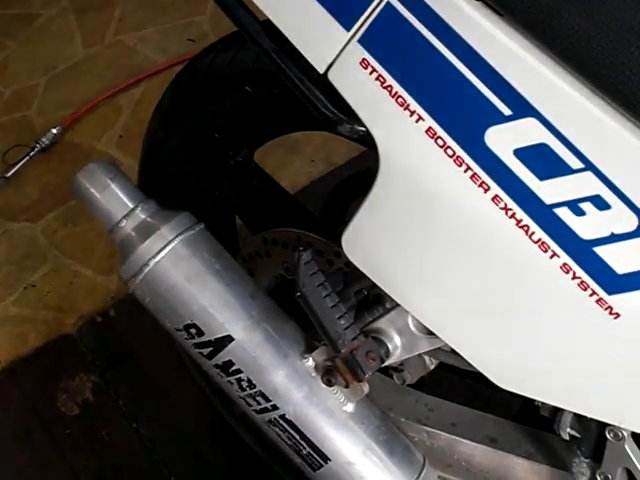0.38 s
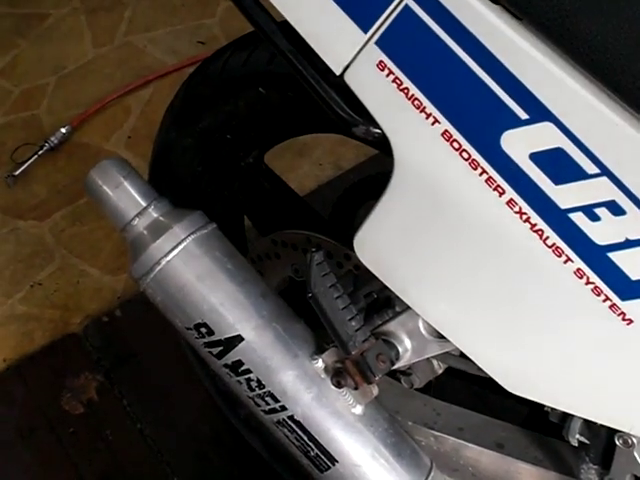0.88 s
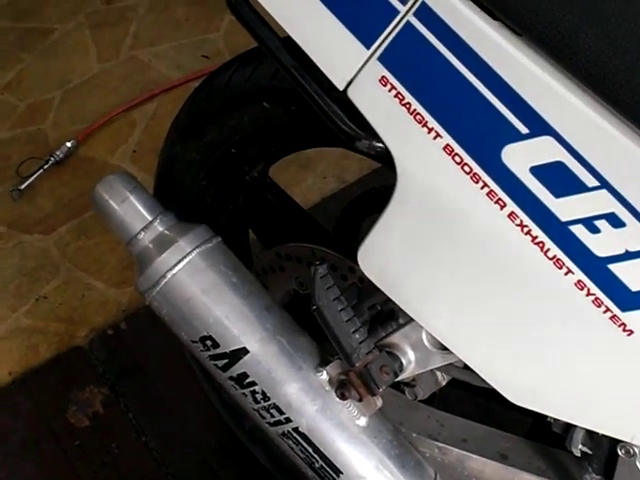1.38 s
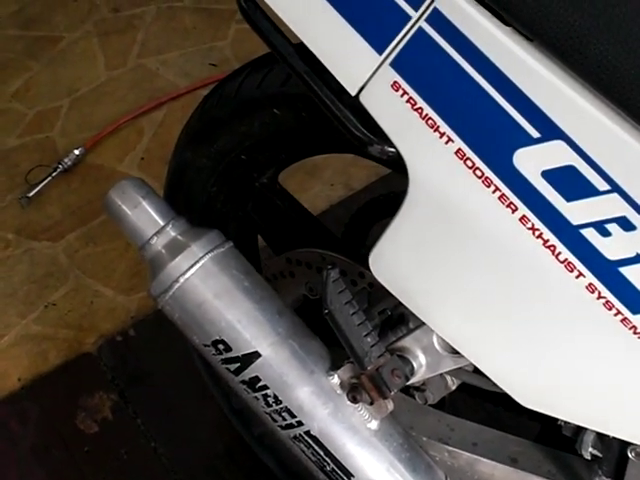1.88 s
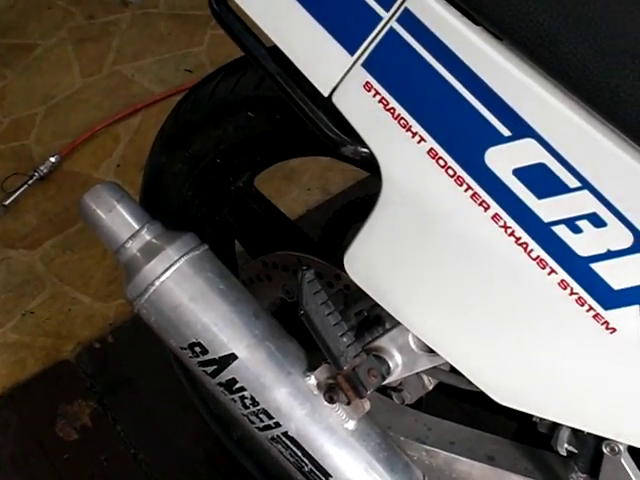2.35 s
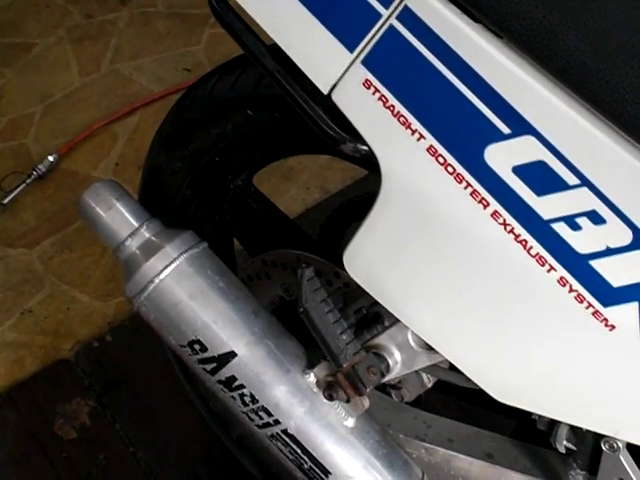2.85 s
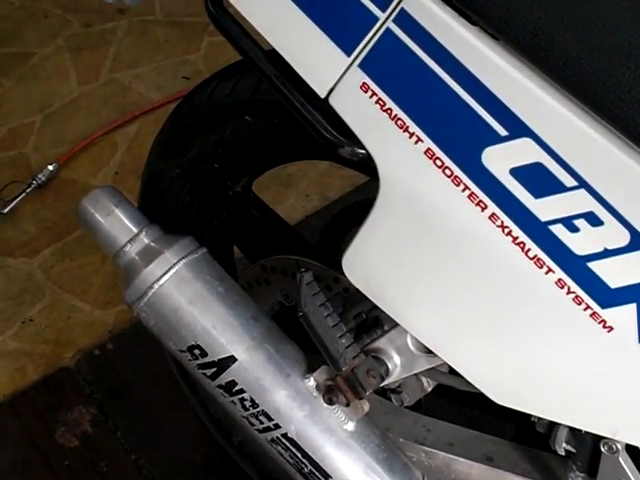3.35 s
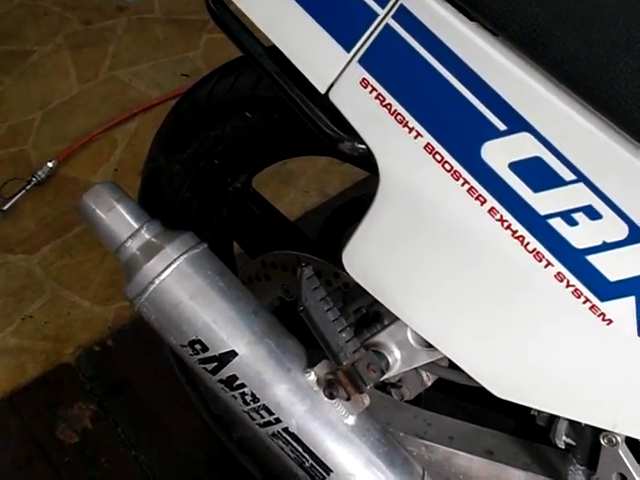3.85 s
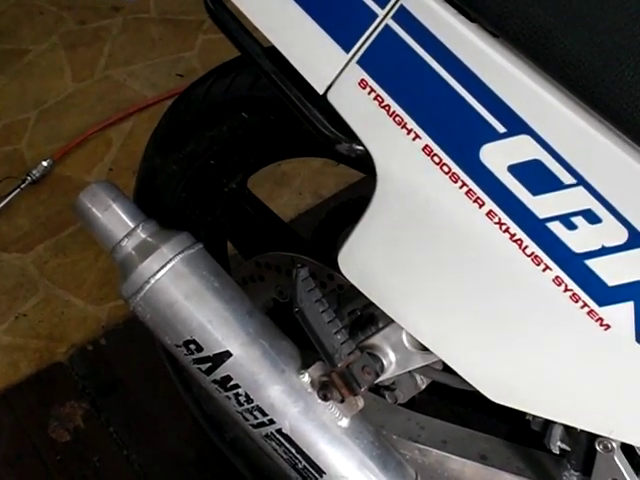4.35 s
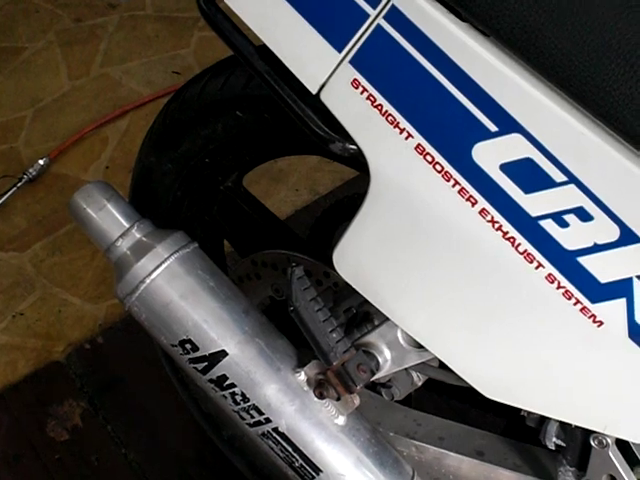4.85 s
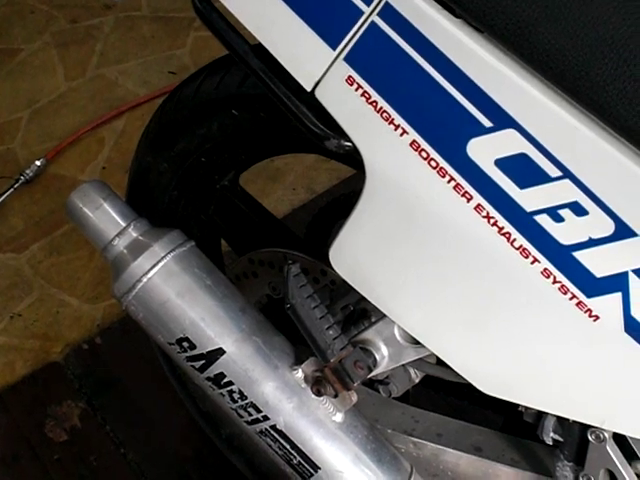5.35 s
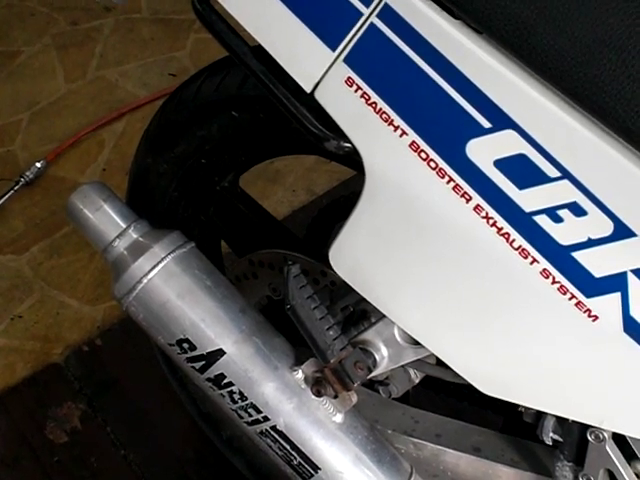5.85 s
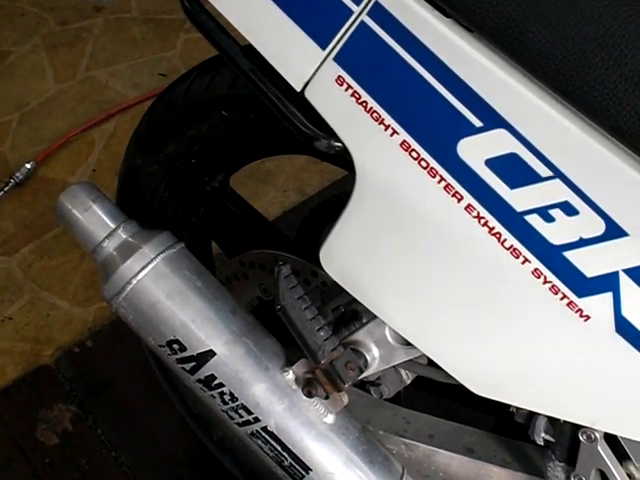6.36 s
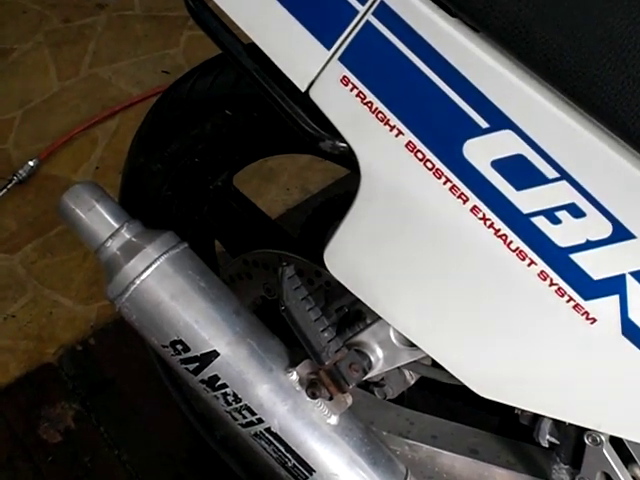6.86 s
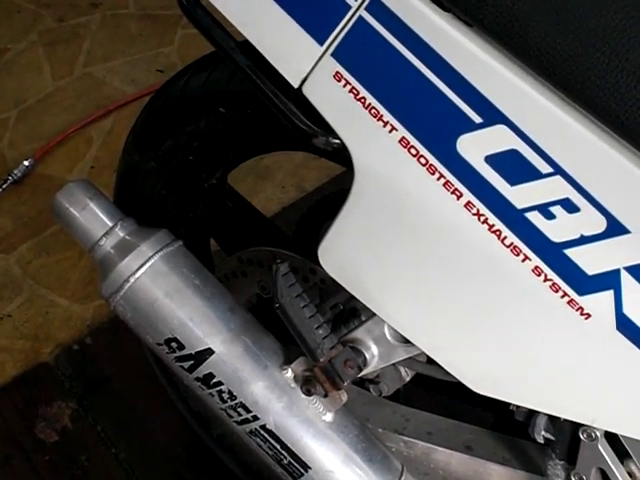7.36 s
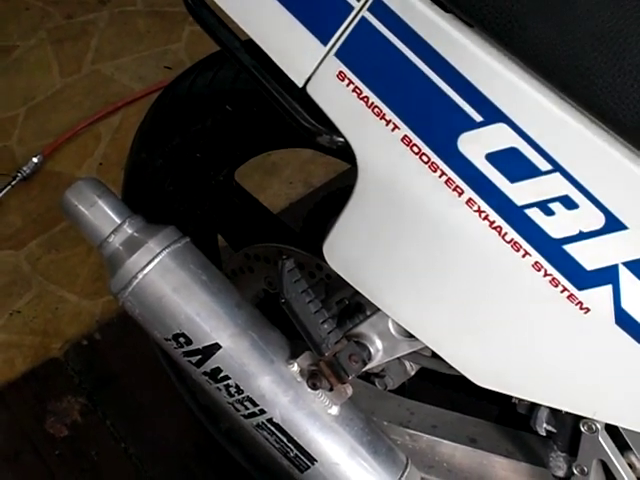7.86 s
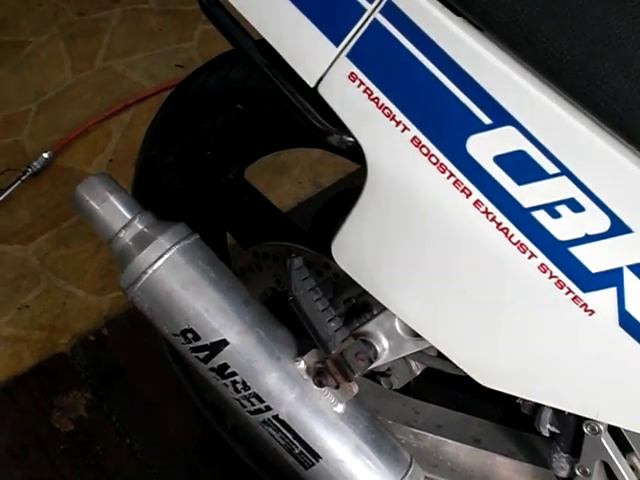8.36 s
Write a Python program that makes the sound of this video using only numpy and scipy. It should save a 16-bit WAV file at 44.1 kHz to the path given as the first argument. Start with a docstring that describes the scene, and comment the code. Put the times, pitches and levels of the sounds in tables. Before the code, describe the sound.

A four-cylinder motorcycle engine stands idling, its exhaust right beside the microphone, low and lumpy, surging and stumbling. Two quick throttle blips follow, each sweeping up into a hard, bright rasp with a crack near the top, then falling smoothly into a softer hum. Gas hiss and slight valve rattle beat with the firing; hard floor and walls add short reverberation.

```python
"""Indoors, close to the silencer of a four-cylinder motorcycle: its engine idles unsteadily and is blipped twice.
Three steady tones follow the firing rate, and uneven firing pulses ring the pipe as a rumble with deep thuds.
Under load the pulses steepen into a rasp; filtered noise makes gas rush and hiss that beat with the firings.
Valves rattle, a gear whines and two hard cracks come near full speed; air whistles past the opening throttle.
Random echoes, dying away, stand for the hard walls and floor."""
import sys
import numpy as np
from scipy import signal
from scipy.fft import irfft
from scipy.io import wavfile
from scipy.ndimage import uniform_filter1d

SR = 44100
rng = np.random.default_rng(int(sys.argv[2]) if len(sys.argv) > 2 else 0)


def to_wav(s):
    """Save 16-bit WAV."""
    ch = np.atleast_2d(s).T  # columns
    pcm = np.round(np.clip(ch, -1, 1) * 32767)  # PCM
    wavfile.write(sys.argv[1], SR, pcm.astype(np.int16))


def how_loud(loudness_db):
    """Turn decibels into a plain amplitude multiplier (0 dB gives 1, 20 dB gives 10)."""
    steps = np.asarray(loudness_db, float) / 20
    return 10 ** steps


N = 373668
TIME = np.arange(N) / SR  # seconds
HZ = np.fft.rfftfreq(8192, 1 / SR)  # frequencies at which responses are worked out


# Engine speed as set, before hunting adds to it. Each row: time in seconds, firings per second.
SET_SPEED = [(0, 47.3), (1.5, 48), (2.7, 46.8), (3.44, 47), (3.56, 78.9), (3.73, 142), (3.89, 228.6),
             (4.01, 265), (4.12, 289), (4.25, 298.6), (4.31, 292), (4.37, 262), (4.6, 188.7), (4.78, 145),
             (4.98, 113.5), (5.23, 85.1), (5.64, 65), (5.9, 59), (6.25, 55.2), (6.35, 79.1), (6.51, 160.1),
             (6.65, 229.6), (6.72, 256), (6.82, 284), (6.91, 327.6), (6.98, 341.2), (7.03, 328.6),
             (7.24, 246.6), (7.41, 196.1), (7.55, 163.3), (7.74, 128), (7.97, 97.2), (8.3, 73.6),
             (8.47, 64.4)]
# Loudness of the outlet noises before hunting. Each row: time in seconds, rasp and rush in dB, hiss in dB.
OUTLET_LEVELS = [(0, -43, -40.5), (2.2, -43.5, -40.5), (3.45, -41, -38), (3.54, -37.5, -34),
                 (3.68, -38, -33.5), (3.73, -31, -31), (3.77, -37.5, -34.5), (4.01, -21.5, -30),
                 (4.06, -38, -32), (4.08, -23.5, -26.5), (4.25, -24, -28.5), (4.29, -33, -30.5),
                 (4.43, -39.5, -34), (4.6, -40.5, -41), (4.98, -54, -49.5), (5.4, -57.5, -53.5),
                 (6.25, -57.5, -53.5), (6.32, -48, -44.5), (6.51, -36, -33.5), (6.6, -35, -33.5),
                 (6.67, -24.5, -31), (6.78, -22.5, -30.5), (6.82, -23, -22.5), (6.92, -24, -24.5),
                 (6.96, -26.5, -28.5), (7.01, -38.5, -32), (7.31, -44, -42.5), (7.74, -56.5, -54),
                 (8.47, -64, -60.5)]
HUNT_RASP, HUNT_HISS = 0.32, 0.32  # shares of the hunting dB


def engine():
    """All sounds of the running engine share one count of firings, so they speed up and slow down together."""
    hunt_db, gained = hunting()
    rate = curves(SET_SPEED)[0] + gained
    rasp_db, hiss_db = curves(OUTLET_LEVELS) + np.outer([HUNT_RASP, HUNT_HISS], hunt_db)
    uneven_db, steep, cut_db, thud_db = throttle(rate)
    uneven_db, steep = np.clip(uneven_db, .4, 6), np.clip(steep, 0, 1)
    turns = np.cumsum(rate) / SR  # firings so far
    tones = ringing(orders(rate, turns, uneven_db, hunt_db))
    pulses = uneven_pulses(rate, turns, uneven_db)
    noises = rumble(pulses, rate, uneven_db, hunt_db, cut_db, thud_db)
    noises += rasp(pulses, rate, uneven_db, steep, rasp_db, hiss_db)
    noises += rush(turns, steep, rasp_db)
    noises += hiss(rate, turns, steep, hiss_db)
    noises += gear(rate, turns, rasp_db)
    return room(tones, t60=0.41, wet_db=-14) + room(noises, t60=0.65, wet_db=-8.0)


# The engine hunts: runs of strong burns surge, weak ones stumble.
# Each row: middle in seconds, spread to each side in seconds, level change in dB.
HUNTING_SWINGS = [(.12, .05, 2), (.23, .025, -4), (.33, .05, 4), (.46, .035, -5), (.62, .06, 2),
                  (.82, .03, -4.5), (.93, .05, 2.5), (1.08, .025, -6), (1.2, .06, 4), (1.36, .04, -4.5),
                  (1.57, .07, 2), (1.7, .035, -4), (1.87, .04, 5), (2, .045, -6.5), (2.13, .05, 2.5),
                  (2.29, .025, -4), (2.42, .03, 2), (2.57, .03, -3), (2.72, .04, -2), (2.86, .04, 2.5),
                  (2.97, .02, -3.5), (3.15, .03, -4), (3.25, .05, 3), (3.4, .06, 2), (5.18, .015, -5),
                  (5.31, .015, -5), (5.69, .025, -7), (5.83, .02, -7), (6.08, .015, -4), (7.98, .03, -4),
                  (8.2, .03, -3)]
GAIN_PER_DB_S, SETTLE_S = 7.5, .3  # firings per s gained per dB held a second; time to settle back


def hunting():
    """Strong burns push the speed up, weak ones let it sag: gives the level swing in dB and the added speed."""
    db = sum(size_db * np.exp(-.5 * ((TIME - s) / spread) ** 2) for s, spread, size_db in HUNTING_SWINGS)
    gained = signal.lfilter([GAIN_PER_DB_S / SR], [1, -np.exp(-1 / SETTLE_S / SR)], db)
    return db, gained


# Throttle blips. Each row: opening, shutting and return of firing, all in seconds,
# then thud level from that return on, in dB against the thuds at the start.
THROTTLE_BLIPS = [(3.468, 4.283, 4.54, -1.5), (6.26, 6.974, 7.37, -4)]
# burns even out with speed under load; a shut throttle pumps evenly
UNEVEN_DB, EVEN_DB_PER_RATE, PUMPING_DB = 3.5, 0.04, 1.7
# share of the rasp that is steep pulses, growing with firings per s gained
STEEP_IDLE, STEEP_PER_RATE, STEEP_MOST, STEEP_DIES_S = 0.046, 0.0033, 0.76, .1
CUT_DB, CUT_S = -13.5, 0.043  # with no fuel burning the rumble sinks
THUD_LOSS_DB, THUD_FADE_S = -40, 0.24  # thuds fade once the throttle is open


def throttle(rate):
    """Load evens and steepens the burns: gives unevenness, steep share, and changes of rumble and thuds in dB."""
    uneven_db, steep = np.full(N, UNEVEN_DB), np.full(N, STEEP_IDLE)
    cut, thud_db = np.zeros(N), np.zeros(N)
    for opens, shuts, resumes, after_db in THROTTLE_BLIPS:
        on = (TIME > opens) & (TIME <= shuts)
        off = (TIME > shuts) & (TIME < resumes)
        gained = np.interp(np.minimum(TIME, shuts), TIME, rate) - rate[0]
        loaded_db = UNEVEN_DB - EVEN_DB_PER_RATE * gained
        uneven_db = np.where(on, loaded_db, np.where(off, PUMPING_DB, uneven_db))
        load = np.minimum(STEEP_PER_RATE * gained, STEEP_MOST)
        load = load * np.exp(-np.maximum(TIME - shuts, 0) / STEEP_DIES_S)
        steep = np.maximum(steep, load * (on | off))
        cut += off * np.minimum((TIME - shuts) / CUT_S, 1)
        fading_db = thud_db + THUD_LOSS_DB * np.minimum((TIME - opens) / THUD_FADE_S, 1)
        thud_db = np.where(on | off, fading_db, np.where(TIME >= resumes, after_db, thud_db))
    return uneven_db, steep, CUT_DB * cut, thud_db


# Tones at 1, 2 and 3 times the firing rate, before standing waves and hunting.
# Each row: time in seconds, first tone in dB, second and third in dB against the first.
TONE_LEVELS = [(0, -16, -5, -7.5), (3.44, -15.5, -5.5, -7.5), (3.49, -12.5, -5, -18),
               (3.55, -9.5, -4, -12.5), (3.66, -13, -10.5, -6.5), (3.75, -15.5, -2, -9),
               (3.85, -15, -5.5, -10.5), (4.0, -20.5, 1.5, -1), (4.1, -24, 4.5, -0.5),
               (4.25, -22.5, 1.5, 4.5), (4.3, -23.5, -5, -10), (4.36, -20.3, -12, -18),
               (4.5, -22.5, -12, -22), (4.7, -28.5, -7.5, -24), (4.9, -31.5, -1.5, -16),
               (5.1, -32, -15, -8.5), (5.5, -34, -3.5, -15), (6.2, -31, -1, -11), (6.4, -22, -4, -6),
               (6.46, -19, -6, -8), (6.52, -15.5, -2, -8), (6.6, -16, -4, -10), (6.67, -16.5, -2.5, -4.5),
               (6.8, -22.5, 1.5, -4.5), (6.94, -23, 1, 2.5), (6.98, -30, -4, -6), (7.04, -26, -8, -15),
               (7.09, -30, -8, -12), (7.18, -26, -12, -24), (7.3, -26.5, -14, -29),
               (7.55, -33.5, -8.5, -23), (7.8, -38, -2, -10.5), (8.1, -38.5, -10.5, -6.5),
               (8.47, -37.5, -3.5, -23)]
# Standing waves lift or sink a tone that sweeps across them. Each row: frequency in Hz, change in dB.
STANDING_WAVES = [(45.0, -6), (70.0, -7.5), (95.0, -8), (120.0, 0.5), (145.0, 1), (160.0, 0), (180.0, -3.5),
                  (205.0, -2.3), (228.0, -1), (250.0, -0.3), (263.0, 7), (285.0, -0.5), (300.0, 5),
                  (315.0, 2), (330.0, 5), (345.0, 2.5), (365.0, -1.2), (410.0, -2), (460.0, 1.5),
                  (505.0, 2), (530.0, -2.0), (560.0, 0.2), (600.0, -9), (665.0, 2.2), (720.0, 0.2),
                  (800.0, -5.5), (890.0, -1), (1020.0, -6.1)]
# One number for each tone: how far it lags, in radians.
TONE_LAGS = [0.55, 1, 1]
# One number for each tone: its share of the burns' unevenness.
TONE_WAVER = [.42, 0.86, .9]
# One number for each tone: its share of the hunting dB.
TONE_HUNT_SHARES = [0.3, 1.2, 0.64]


def orders(rate, turns, uneven_db, hunt_db):
    """Regular firing gives tones at multiples of its rate, coloured by the standing waves that they cross."""
    first_db, *upper_db = curves(TONE_LEVELS)
    f, lift_db = np.transpose(STANDING_WAVES)
    settings = zip([0] + upper_db, TONE_LAGS, TONE_WAVER, TONE_HUNT_SHARES)
    out = np.zeros(N)
    for k, (step_db, lag, share, hunt) in enumerate(settings, 1):
        standing_db = np.interp(np.log(k * rate), np.log(f), lift_db)
        db = first_db + step_db + standing_db + hunt * hunt_db
        spin = np.exp(1j * (2 * np.pi * k * turns - lag))
        out += np.sqrt(2) * how_loud(db) * np.real(waver(turns, uneven_db, share) * spin)
    return out


def waver(turns, uneven_db, share):
    """Strength and timing drift from one pair of firings to the next: a complex factor on a tone."""
    pairs = np.arange(int(turns[-1]) // 2 + 2)
    size, slip = (np.interp(turns / 2, pairs, c) for c in rng.standard_normal((len(pairs), 2)).T)
    return undb(share * uneven_db * (size + 1j * slip))


def ringing(tones):
    """A sharp standing wave at 325 Hz, 9 Hz wide, rings on as the tones sweep by."""
    s = 1j * HZ
    return tones + how_loud(4.5) * colour(tones, 9 * s / (325 ** 2 + 9 * s + s ** 2))


def uneven_pulses(rate, turns, uneven_db):
    """Firing pulses less their mean and three steady tones: what uneven burns and higher orders add."""
    pulses = firings(turns, uneven_db, jitter=0.0074)
    steady = 1 + 2 * sum(np.cos(2 * np.pi * k * turns) for k in (1, 2, 3))
    return pulses - rate / SR * steady


# One number for each cylinder in firing order: its lasting strength, as a multiple of the unevenness in dB.
CYLINDER_STRENGTHS = [0.56, 0.0012, 0.38, -0.041]


def firings(turns, uneven_db, jitter):
    """One pulse a firing, split between the two nearest samples; each burn differs in strength and timing."""
    count = np.arange(1, int(turns[-1]))
    size, late = rng.uniform(-1, 1, (len(count), 2)).T * np.sqrt(3)  # rms 1
    spread_db = uneven_db[np.interp(count, turns, np.arange(N)).astype(int)]
    at = np.minimum(np.interp(count + jitter * spread_db * late, turns, np.arange(N)), N - 2)
    strength_db = spread_db * (np.take(CYLINDER_STRENGTHS, count % len(CYLINDER_STRENGTHS)) + size)
    gain = how_loud(strength_db - spread_db ** 2 * np.log(10) / 40)  # offsets the mean gain added by the spread
    out = np.zeros(N)
    np.add.at(out, at.astype(int), gain * (1 - at % 1))
    np.add.at(out, at.astype(int) + 1, gain * (at % 1))
    return out


# The pipe rung by uneven burns and higher orders, before hunting and fuel cut.
# Each row: time in seconds, level in dB.
RUMBLE_LEVEL = [(0, -23.5), (1.9, -25.5), (2.7, -26.5), (3.4, -24), (3.58, -18), (3.68, -19.5), (3.8, -34),
                (3.9, -25.5), (4.0, -32), (4.2, -41), (4.28, -34), (4.56, -28.5), (4.7, -37), (4.94, -37.5),
                (5.37, -33), (5.6, -37.5), (6.25, -34), (6.38, -25.5), (6.55, -26), (6.65, -29.5),
                (6.8, -34), (6.88, -34.5), (6.99, -41), (7.4, -38), (7.65, -44), (8.14, -41), (8.38, -38),
                (8.47, -55)]
# Resonances of pipe, silencer and floor, before the silencer's damping.
# Each row: frequency in Hz, width in Hz, relative level in dB.
PIPE_RESONANCES = [(56.4, 17, -8.5), (112, 35, -2), (144.7, 59, -2.5), (226, 15, -4.5), (259.7, 25.5, -4),
                   (298.5, 15.4, -5.5), (330, 9.1, -4.5), (391, 25.3, -11), (437, 7.7, -15.5),
                   (461, 45, -22.5)]
HUNT_RUMBLE = 0.74  # share of the hunting dB
THUD_DB = -7.5  # thuds against the rumble at the start


def rumble(pulses, rate, uneven_db, hunt_db, cut_db, thud_db):
    """Pulses ring the pipe's resonances; its lowest mode gives the deep thuds of hit-and-miss firing."""
    rumble_db = curves(RUMBLE_LEVEL)[0] + HUNT_RUMBLE * hunt_db + cut_db
    s = 1j * HZ
    pipe = sum((-1) ** k * how_loud(db) * w * s / (f ** 2 + w * s + s ** 2)
               for k, (f, w, db) in enumerate(PIPE_RESONANCES))
    pipe = pipe / (1 + 0.9 * s / 470 + (s / 470) ** 2) ** 2  # the silencer stops the highs
    pipe = pipe * (s / (s + 30)) ** 2  # less deep bass
    out = colour(pulses * how_loud(rumble_db) / train_rms(pipe, rate, uneven_db, order=4), pipe)
    low = (30 * s / (52 ** 2 + 30 * s + s ** 2)) ** 2  # the whole pipe's lowest mode
    thuds = pulses * how_loud(rumble_db + THUD_DB + thud_db) / train_rms(low, rate, uneven_db, order=4)
    return out + colour(thuds, low)


# Tone of the steep pulse fronts leaving the outlet. Each row: frequency in Hz, relative level in dB.
FRONT_TONE = [(350, -46.5), (480, -6), (600, -4), (700, 0.5), (810, -10.5), (890, -2), (1200, -15.5),
              (1800, -14), (2300, -17), (2800, -26.5), (6000, -72.5)]
# Tone of the sharpest part of the fronts. Each row: frequency in Hz, relative level in dB.
EDGE_TONE = [(1500, -36), (2400, -20), (3000, -2.5), (4000, 8), (4700, 5), (6000, -24), (12000, -55)]


def edge_part(steep):
    """Only hard-driven fronts reach the highest frequencies: their share of the hiss power."""
    return 0.48 * steep ** 2


def rasp(pulses, rate, uneven_db, steep, rasp_db, hiss_db):
    """Strong pulses steepen on their way down the pipe and leave it as sharp fronts."""
    front, edge = causal(FRONT_TONE), causal(EDGE_TONE)
    front_rms = train_rms(front * (HZ > 1050), rate, uneven_db, order=4)  # levelled by its treble
    edge_rms = train_rms(edge, rate, uneven_db, order=4)
    out = colour(pulses * how_loud(rasp_db) * np.sqrt(steep) / front_rms, front)
    out += colour(pulses * how_loud(hiss_db) * np.sqrt(edge_part(steep)) / edge_rms, edge)
    return out + cracks(front + .3 * edge)


# Single hard cracks from the outlet near full speed. Each row: time in seconds, peak in dB before the room.
CRACK_HITS = [(4.072, -14), (6.808, -7)]


def cracks(front):
    """One steep front for each crack."""
    shape, hits = irfft(front), np.zeros(N)
    for s, peak_db in CRACK_HITS:
        hits[round(s * SR)] = how_loud(peak_db)
    return signal.oaconvolve(hits, shape / abs(shape).max())[:N]


# Tone of the gas rushing out. Each row: frequency in Hz, relative level in dB.
RUSH_TONE = [(300, -29.5), (500, -0.5), (580, -4), (670, 4.5), (820, -8.5), (960, -4.5), (1400, -7.5),
             (1800, -7), (2600, -10), (4000, -24), (8000, -77)]


def rush(turns, steep, rasp_db):
    """Turbulent gas puffs with the firings and yields to the rasp as the pulses steepen."""
    gas = evened(colour(rng.standard_normal(N), causal(RUSH_TONE)))
    gas *= how_loud(rasp_db + 3.0) * np.sqrt(1 - steep)
    return gas * beats(turns, depth=0.29, sharp=0.83, cycle_db=0.5, burst_db=1.5)


# Tone of the gas hiss. Each row: frequency in Hz, relative level in dB.
HISS_TONE = [(1200, -33.5), (2200, -1.5), (2950, 4), (3600, 0), (4300, -1), (4900, -1.5), (5500, 0),
             (6000, -5), (6700, -1), (7600, -6.5), (7950, -10), (8300, -5.5), (9500, -10), (10400, -11.5),
             (13500, -16), (15400, -12), (15800, -18), (16300, -17), (17700, -18)]


def hiss(rate, turns, steep, hiss_db):
    """Gas hiss beats with the firings; fast gas moves it down into the outlet's roar. Valves rattle in it."""
    roar = np.clip(0.0009 * (rate - 60), 0, .8)
    gas = rng.standard_normal(N)
    out = (1 - roar) * evened(colour(gas, causal(HISS_TONE))) + roar * evened(colour(gas, causal(EDGE_TONE)))
    out *= np.sqrt(abs(1 - edge_part(steep)))
    out *= beats(turns, depth=0.68, sharp=0.26, cycle_db=0.2, burst_db=0.85)
    rattles = valves(turns) * how_loud(-.03 * rate + 2.5)  # sinks against the hiss with speed
    return how_loud(hiss_db) * (out + rattles)


def beats(turns, depth, sharp, cycle_db, burst_db):
    """Noise envelope: a puff at each firing, a swell once an engine cycle, and chance bursts."""
    puff = 1 + depth * np.exp(-(turns % 1) / sharp)
    cycle = how_loud(cycle_db * np.cos(2 * np.pi * turns / len(CYLINDER_STRENGTHS)))
    drift = uniform_filter1d(uniform_filter1d(rng.standard_normal(N), 700), 500)
    return evened(puff * cycle * how_loud(burst_db * evened(drift)))


# Valve rattles. Each row: place in the engine cycle from 0 to 1, frequency in Hz, width in Hz,
# level in dB against one another.
VALVE_RATTLES = [(.1, 11300, 900, -19), (.55, 11800, 1000, -22), (.8, 12000, 900, -25),
                 (.3, 15200, 700, -31)]


def valves(turns):
    """Valves seat at set points of the cycle, each a short rattle in the head's high modes."""
    cycle, out = turns / len(CYLINDER_STRENGTHS), np.zeros(N)
    chance = rng.standard_normal(int(turns[-1]) + 1)[turns.astype(int)]  # a new strength each firing
    for place, hz, width, db in VALVE_RATTLES:
        decay = np.exp(-((cycle - place) % 1) / .09)
        rattle = decay * how_loud(2.5 * chance) * rng.standard_normal(N)
        mode = width * 1j * HZ / (hz ** 2 - HZ ** 2 + width * 1j * HZ)
        out += how_loud(db) * evened(colour(rattle, mode))
    return out


GEAR_ORDER, GEAR_DB = 10.4, -2  # teeth per firing; peak against the rasp level at 95 firings per s


def gear(rate, turns, rasp_db):
    """Meshing teeth whine at a fixed multiple of the firing rate, strongest near 95 firings per s."""
    return how_loud(rasp_db + GEAR_DB - .25 * abs(rate - 95)) * np.sin(2 * np.pi * GEAR_ORDER * turns)


# Air whistling past the opening throttle. Each row: seconds after opening, frequency in Hz, level in dB.
WHISTLE_PATH = [(.02, 11250, -64), (.08, 11400, -54), (.16, 12050, -62), (.26, 12900, -52),
                (.35, 13200, -53.5), (.43, 13450, -66)]


def whistles():
    """One intake whistle for each opening of the throttle."""
    return sum(whistle([(blip[0] + s, hz, db) for s, hz, db in WHISTLE_PATH]) for blip in THROTTLE_BLIPS)


def whistle(rows):
    """Slow noise carried up to a rising frequency makes a fuzzy band."""
    hz, db = curves(rows)
    slow = signal.lfilter([1], [1, -.965], rng.standard_normal((2, N)))
    slow = signal.lfilter([1], [1, -.965], slow)
    band = np.real((slow[0] + 1j * slow[1]) * np.exp(2j * np.pi * np.cumsum(hz) / SR))
    return how_loud(db) * evened(band) * (TIME > rows[0][0]) * (TIME < rows[-1][0])


def room(x, t60, wet_db):
    """Hard walls and floor: sparse echoes of random sign, falling 60 dB in t60 seconds."""
    taps, at = np.zeros(SR // 2), np.arange(200, SR // 2 - 20, 20)
    echoes = rng.choice([-1., 1.], len(at)) * how_loud(-60 * at / SR / t60)
    taps[at + rng.integers(0, 20, len(at))] = echoes
    return x + how_loud(wet_db) * signal.oaconvolve(x, taps / np.linalg.norm(taps))[:N]


def undb(db):
    """Decibels to gain, also for complex values (imaginary part turns the phase)."""
    return np.exp(db * np.log(10) / 20)


def evened(x):
    """Scales to rms 1."""
    return x / np.sqrt(np.mean(x ** 2) + 1e-20)


def curves(rows):
    """Every column of a table, after the time, at every sample."""
    s, *columns = np.transpose(rows)
    return [np.interp(TIME, s, c) for c in columns]


def causal(points):
    """Minimum-phase response for a spectrum of (Hz, dB) points."""
    f, db = np.transpose(points)
    log_gain = np.log(how_loud(np.interp(np.log(HZ + 1), np.log(f), db)))
    phase = -signal.hilbert(np.r_[log_gain, log_gain[-2:0:-1]]).imag[:len(HZ)]
    return np.exp(log_gain + 1j * phase)


def colour(x, response):
    """Passes x through a response."""
    return signal.oaconvolve(x, irfft(response))[:N]


def train_rms(response, rate, uneven_db, order):
    """Rms of a pulse train after the response: lines from this order up, plus the rumble of uneven strengths."""
    grid = np.geomspace(40, 360, 200)[:, None, None]  # firings per s
    lines = grid * np.arange(order, 128)[:, None] * np.linspace(.96, 1.04, 5)  # averaged over nearby speeds
    line_power = np.interp(lines, HZ, abs(response) ** 2).mean(2).sum(1)
    power = 2 * line_power * (grid.ravel() / SR) ** 2
    scatter = (uneven_db * np.log(10) / 20) ** 2 * rate / SR * np.mean(abs(response) ** 2)
    return np.sqrt(np.interp(rate, grid.ravel(), power) + scatter)


def scene():
    """The engine and its intake whistles, as one channel."""
    return (engine() + whistles())[None]


def top_cut(x):
    """Nothing passes above the cut-off."""
    return signal.sosfilt(signal.butter(12, 17800, fs=SR, output="sos"), x)


def record(dry):
    """The microphone drops the deepest bass, below 33 Hz; a soft ceiling rounds the peaks."""
    cut = signal.sosfilt(signal.butter(4, 33, "high", fs=SR, output="sos"), dry)
    mix = 1.397 * np.tanh(cut / 1.4)
    return top_cut(mix)


dry = scene()
out = record(dry)
to_wav(out)
```